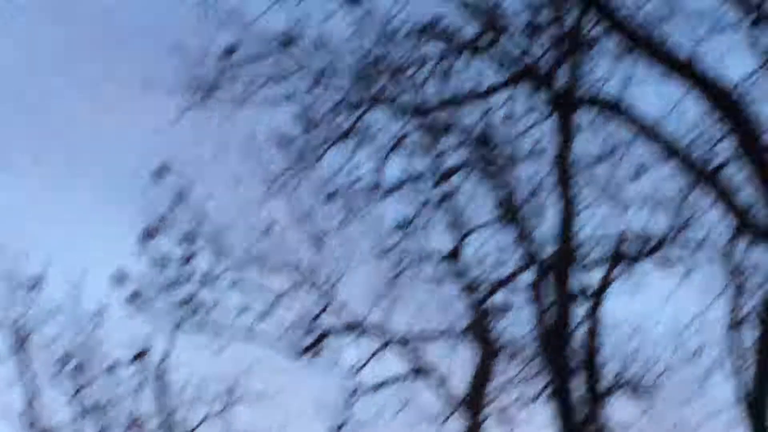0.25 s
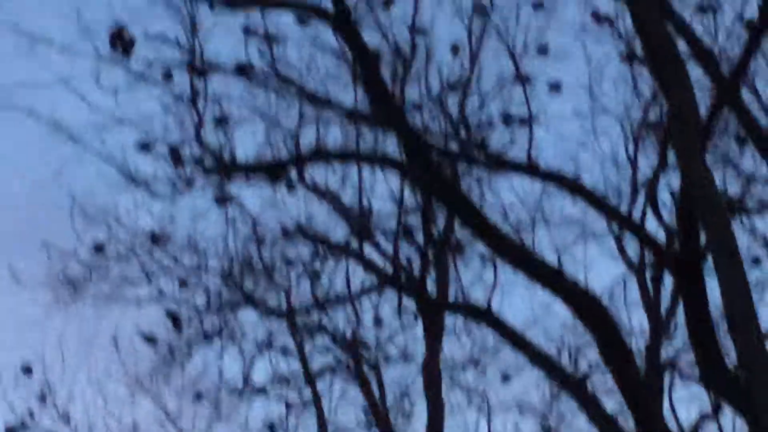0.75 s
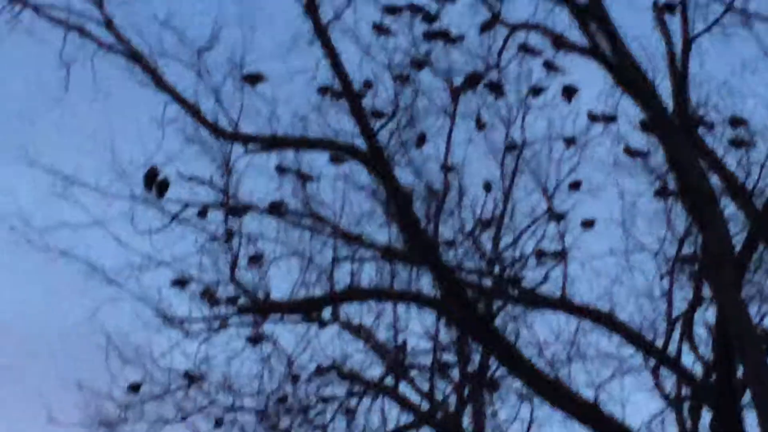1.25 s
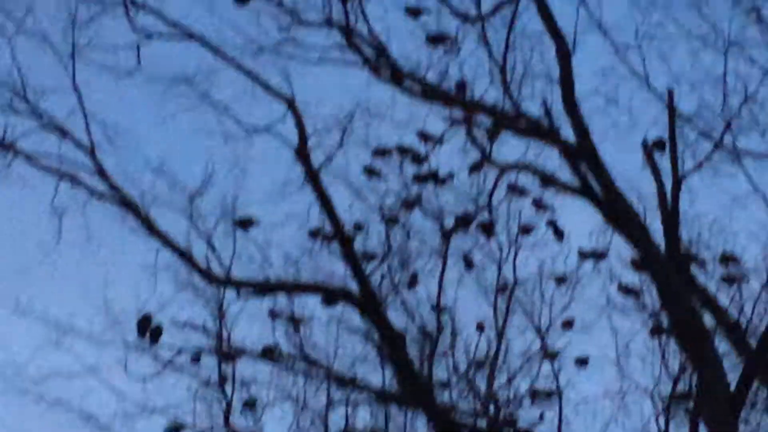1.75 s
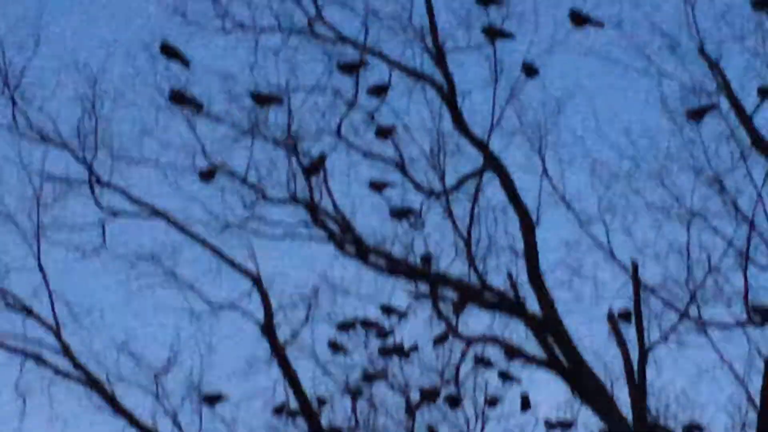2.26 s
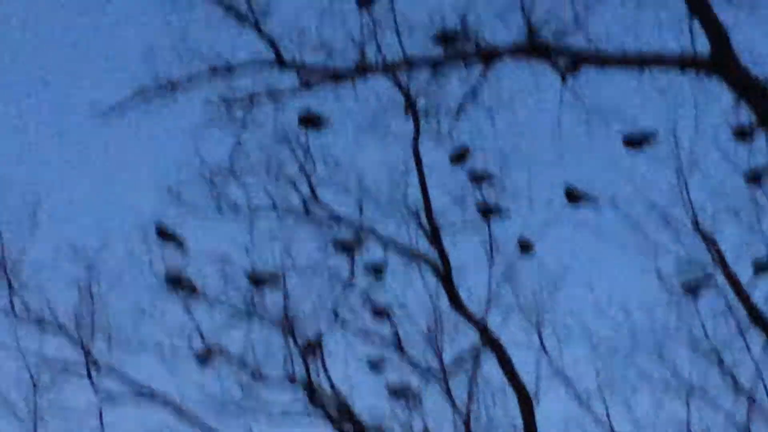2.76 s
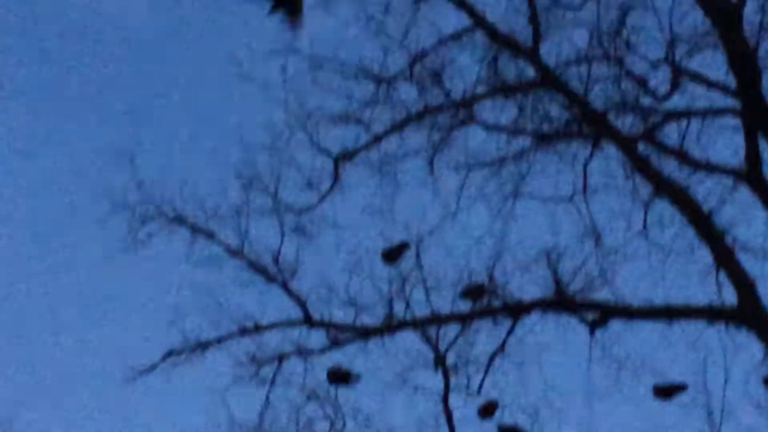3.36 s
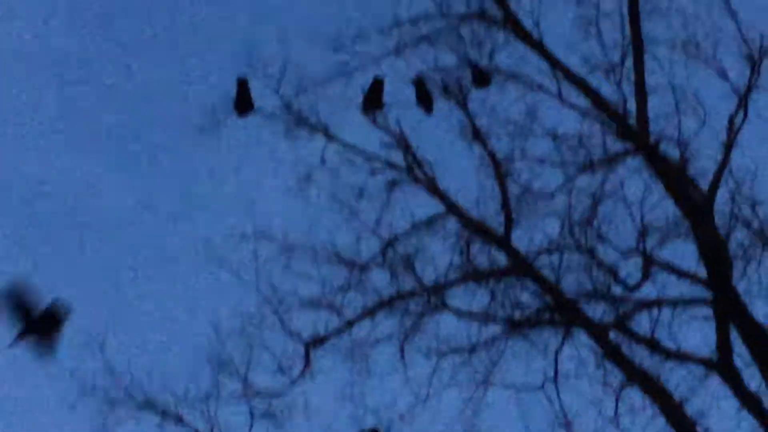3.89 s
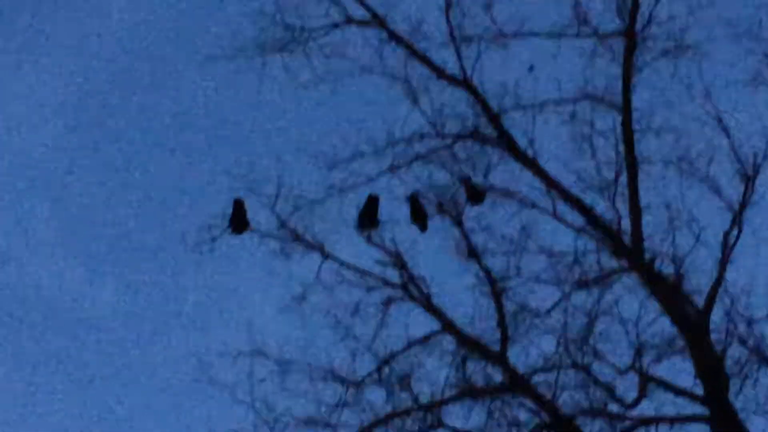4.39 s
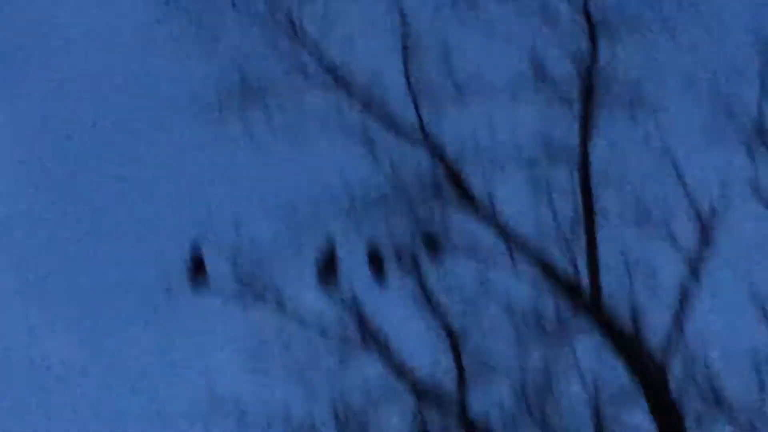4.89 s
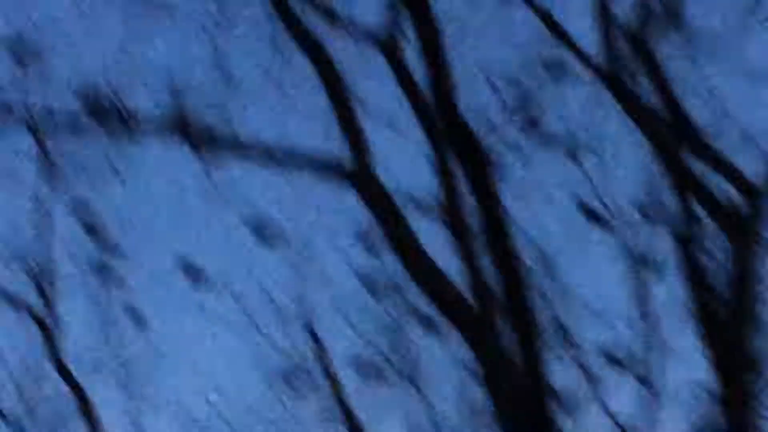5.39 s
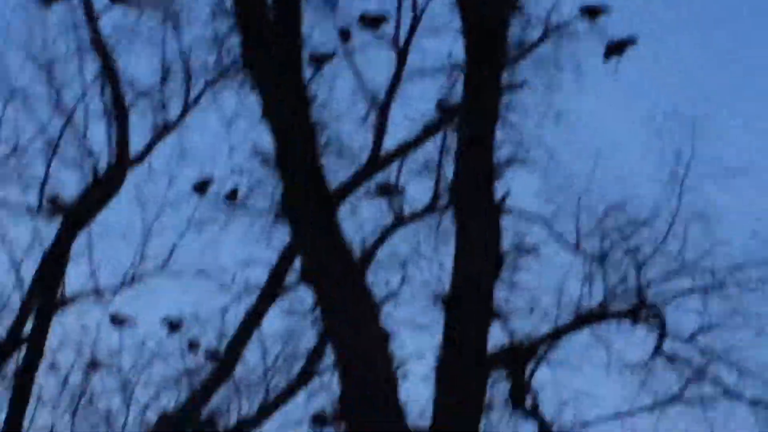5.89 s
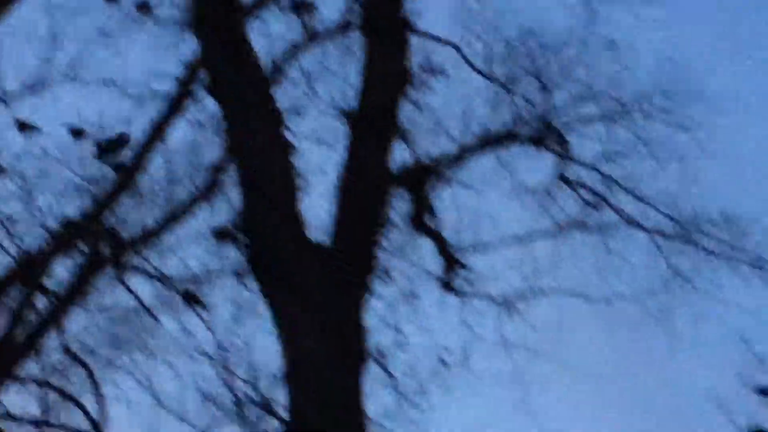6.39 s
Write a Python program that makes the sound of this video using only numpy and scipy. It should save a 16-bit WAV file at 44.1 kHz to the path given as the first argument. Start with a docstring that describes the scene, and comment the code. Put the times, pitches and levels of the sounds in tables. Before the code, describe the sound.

An open wood with a short, diffuse echo, low distant rumble and faint hiss. From the start, hundreds of far crows form a faint blurred chatter. One crow, somewhat distant, gives long hoarse caws at about 0.6, 1.1, 1.65 and 2.2 seconds, each a quarter second or so, arching and falling in pitch. A soft thump lands at 2.5. Small high yips repeat evenly from 2.6 to 3.6. Then nearer crows join with short raspy caws, crowding together between 4 and 6 seconds, with yips and higher yelps breaking upward around 4.8, 5.2 and 5.7. The far flock swells most near 4.6. Dull handling thumps and low rubbing cluster from 4.0 to 5.2, with tiny ticks scattered throughout. A low, rapid flutter strengthens in spells, around 0.2-1.7, 2.5-2.9, 3.6-4.3 and after 5.65. Calling thins to a last weak caw at 6.3, ending around 6.6.

```python
"""A flock of crows at its roost in bare trees at dusk: hoarse caws and short high yelps in an echoing wood.
Each call is a pulse train with a rasp, on an arched pitch, through resonances that shift as the beak opens.
Behind them chatters the far flock, hundreds of calls filtered and echoed, over a bed of rumble and faint hiss.
A hand-held camera adds a low flutter in spells (a beat train ringing its body), handling thumps and ticks."""
import sys
import numpy as np
from scipy import signal
from scipy.fft import rfft, irfft, next_fast_len
from scipy.io import wavfile

SR = 44100
rng = np.random.default_rng(int(sys.argv[2]) if len(sys.argv) > 2 else 0)


def to_wav(s):
    """Save 16-bit WAV."""
    ch = np.atleast_2d(s).T  # columns
    pcm = np.round(np.clip(ch, -1, 1) * 32767)  # PCM
    wavfile.write(sys.argv[1], SR, pcm.astype(np.int16))


N = 292912
TIME = np.arange(N) / SR  # [s]

# Gestures, here and in the sources below, describe the course of one call.
# Shares of its length: top (highest pitch), attack, release, opens (beak half open), opening (time it takes).
# Shares of the top pitch: climb (before the top), leap (a sudden break up to it), drop (after it), jitter.
# In dB: start_db and end_db (against the held level), shake_db (fast tremor),
# flare_db (overtones at the height of the effort against the rest of the call; negative makes them dip).
# The gesture of a long caw:
LONG_GESTURE = dict(top=.35, climb=0.0699, leap=0, drop=.17, attack=0.05, release=0.25, start_db=-17, end_db=-7, opens=.55, opening=0.36, jitter=0.0248, shake_db=3, flare_db=10.5)
# Narrow resonance of the nearly shut beak in high calls: (frequency [Hz], gain [dB])
YELP_SHUT = [(600, -29), (1430, 21), (2200, -17), (5000, -45)]
# Handling thumps: (time [s], peak before the case filter [dB], pitch [Hz])
THUMPS = [(2.527, -36, 79.6), (4.041, -26, 114), (4.115, -29.5, 142), (4.188, -30.5, 84.5),
          (4.297, -24, 129), (4.352, -32, 68.6), (4.399, -21, 115), (4.411, -33.5, 80), (4.529, -28.5, 132),
          (4.692, -29.5, 175), (4.824, -28, 105), (4.866, -32.5, 149), (4.92, -32, 106),
          (4.947, -21.5, 158), (4.961, -26.5, 248), (4.973, -23, 113), (5.023, -25, 88), (5.092, -24, 290),
          (5.145, -38, 258), (5.176, -30.5, 121)]


def amp(db):
    """Level law: decibels to amplitude gain."""
    return 10 ** (np.asarray(db) / 20)


def evened(x):
    """Normalization: scales to rms 1."""
    return x / np.sqrt(np.mean(x ** 2) + 1e-20)


def along(points, at):
    """Linear interpolation of a curve."""
    return np.interp(at, *np.transpose(points))


def ramp(x):
    """Linear ramp: 0 before, a straight rise, 1 after."""
    return np.clip(x, 0, 1)


def read(points, hz):
    """Interpolation of a spectrum on a log-frequency axis."""
    f, value = np.transpose(points)
    return np.interp(np.log(hz + 1), np.log(f), value)


def add(mix, s, sound):
    """Superposition: mixes a sound in at time s, in place."""
    part = mix[max(round(s * SR), 0):][:len(sound)]
    part += sound[:len(part)]


def colour(x, spectrum, treble_db=0):
    """Zero-phase filtering by a spectrum [dB], with a treble shelf that rises from 1700 to 4000 Hz."""
    size = next_fast_len(len(x))
    hz = np.fft.rfftfreq(size, 1 / SR)
    shelf_db = treble_db * read([(1700, 0), (4000, 1)], hz)
    gain = amp(read(spectrum, hz) + shelf_db)
    return irfft(rfft(x, size) * gain, size)[:len(x)]


def wander(t, per_s):
    """Random modulation: straight lines between normal draws, per_s of them a second."""
    return np.interp(t * per_s, np.arange(512), rng.standard_normal(512))


def course(u, g):
    """Vocal gesture over the share u of a call (0-1): pitch arch, level swell [dB] and beak opening."""
    leap_share, drop_bend = 0.093, 1.4  # share of the call the break takes; power by which the fall steepens
    before = ramp(1 - u / g["top"])
    after = ramp((u - g["top"]) / (1 - g["top"]))
    leap = g["leap"] * ramp((g["top"] - u) / leap_share)
    arch = 1 - g["climb"] * before ** 2 - leap - g["drop"] * after ** drop_bend
    attack_db = g["start_db"] * ramp(1 - u / g["attack"])
    release_db = g["end_db"] * ramp(1 - (1 - u) / g["release"])
    beak = ramp(.5 + (u - g["opens"]) / g["opening"])
    return arch, attack_db + release_db, beak


def voice(length, hz, rough, gesture):
    """Source of the source-filter model: syrinx pulses and cycle-locked noise; also the beak opening."""
    rattle_hz = 58.14  # the throat's tremor, nearly regular; each call scales it by a chance factor
    t = np.arange(int(length * SR)) / SR
    arch, swell_db, beak = course(t / length, gesture)
    jitter = gesture["jitter"]
    turns = np.cumsum(hz * arch * (1 + jitter * wander(t, 262.8))) / SR + rng.random()
    # Cycles of unequal length blur the high overtones into a rasp
    turns = turns + 1.4 * jitter * wander(t, hz)
    # Closed-form sum of equally strong harmonics up to about 11 kHz
    order = int(11000 / hz) + .5
    pulses = np.sin(2 * np.pi * order * turns) / (np.sin(np.pi * turns) + 1e-12) - 1
    # Noise that bursts and decays once a cycle
    rasp = (0.27 + np.exp(-(turns % 1) / 0.76)) * rng.standard_normal(SR // 2)[:len(t)]
    rough = np.clip(rough, .02, .8)
    rattle_phase = 2 * np.pi * (rattle_hz * rng.uniform(0.882, 1.107) * t + rng.random())
    rattle = np.sin(rattle_phase + 0.8 * wander(t, 27.6))
    shake_db = gesture["shake_db"] * (rattle + .5 * wander(t, 109.7))
    drive = np.sqrt(1 - rough) * evened(pulses) + np.sqrt(rough) * evened(rasp)
    return drive * amp(swell_db + shake_db), beak


def callers(calls, gesture, shut, throat):
    """Source-filter synthesis, one call a row: the resonances crossfade from shut beak to open throat."""
    # Overtones that the effort raises or lowers: (frequency [Hz], gain [dB])
    overtones = [(1900, -34), (2700, 2), (3800, -9), (4300, -2), (6000, -25)]
    flare_lag, flare_width = 0.049, 0.1  # shares of a call: the effort peaks just after the top pitch
    out = np.zeros(N)
    for s, length, hz, db, rough, treble_db in calls:
        drive, beak = voice(length, hz, rough, gesture)
        u = np.linspace(0, 1, len(drive))
        effort = np.exp(-((u - gesture["top"] - flare_lag) / flare_width) ** 2)
        flare = amp(gesture["flare_db"] * (effort - .5)) - 1
        drive = drive + flare * colour(drive, overtones)
        beak = beak + (1 - beak) * min(2 * rough ** 2, 1)  # the harshest calls come with the beak wider
        hollow = evened(colour(drive, shut))
        bright = evened(colour(drive, throat, treble_db))
        call = (1 - beak) * hollow + beak * bright
        add(out, s, amp(db) * evened(call) * signal.windows.tukey(len(call), .1))
    return out


def long_caws():
    """Formant resonance in long, low caws of a crow farther off."""
    # (time [s], length [s], top pitch [Hz], level before the echo [dB], roughness [0-1], treble [dB])
    long_calls = [(.595, 0.25, 421, -48, 0.42, -3), (1.115, .26, 425.7, -49.5, 0.4, -1),
                  (1.65, .29, 422.4, -51.5, 0.3, -3), (2.225, .29, 421.8, -50, 0.42, -3)]
    # Resonances of the nearly shut beak: (frequency [Hz], gain [dB])
    long_shut = [(500, -38), (1050, -3), (1270, 6.5), (1600, -28), (2050, -19.5), (2600, -57), (2950, -7),
                 (3400, -50), (4200, -18.5), (5200, -31), (9000, -40)]
    # Resonances of the open throat: (frequency [Hz], gain [dB])
    long_throat = [(300, -21), (850, -38), (1200, 5.5), (1560, 5), (1800, -1), (2100, -9.5), (2500, -5.5),
                   (2850, -5.5), (3350, -17), (4200, -17), (5000, -22.5), (6200, -19), (7500, -39),
                   (11000, -32)]
    return callers(long_calls, LONG_GESTURE, long_shut, long_throat)


def short_caws():
    """Formant resonance in short, hoarse caws of nearer crows."""
    # (time [s], length [s], top pitch [Hz], level before the echo [dB], roughness [0-1], treble [dB])
    caw_calls = [(2.02, .15, 526, -62.5, 0, 11), (3.56, 0.18, 427, -44, 0.22, 3.5),
                 (3.7, 0.2, 441, -52, .48, -2), (4.065, 0.15, 430.5, -43.5, .12, 2.5),
                 (4.235, .17, 417, -49, 0.54, 0.5), (4.625, .17, 433.4, -45, 0.38, -7),
                 (4.79, 0.14, 450.6, -47.5, 0.38, 4.5), (4.905, .13, 441.6, -45, 0.1, 3),
                 (5.08, .14, 388, -51, 0.36, 4), (5.185, .16, 431.5, -45.5, 0.32, 4),
                 (5.355, 0.1107, 420.5, -45, 0.42, 0), (5.45, 0.29, 459, -51.5, 0.5, -2),
                 (5.645, 0.11, 463, -48.5, 0.4, 6), (5.795, 0.12, 426.2, -45, 0.22, 3),
                 (5.91, 0.17, 385, -50, 0.42, -10), (6.31, 0.17, 430, -57.5, 0.3, -2)]
    # The gesture of a short caw, terms as above
    caw_gesture = dict(top=0.46, climb=.085, leap=0, drop=.115, attack=0.16, release=0.33, start_db=-9, end_db=-15, opens=0.84, opening=.26, jitter=0.0131, shake_db=5.5, flare_db=-4)
    # Resonances of the nearly shut beak: (frequency [Hz], gain [dB])
    caw_shut = [(500, -60), (1050, -10), (1270, 1), (1600, -17), (2100, -23.5), (2600, -31.5), (5000, -35),
                (10000, -48)]
    # Resonances of the open throat: (frequency [Hz], gain [dB])
    caw_throat = [(300, -38), (850, -17), (1100, 14.5), (1500, 7), (2050, 1), (2600, -51), (2950, -7.5),
                  (3600, -28), (4500, -15), (6300, -11.5), (7500, -29), (11000, -43)]
    return callers(caw_calls, caw_gesture, caw_shut, caw_throat)


def high_yelps():
    """Register break: high calls whose pitch leaps upward to its top."""
    # (time [s], length [s], top pitch [Hz], level before the echo [dB], roughness [0-1], treble [dB])
    yelp_calls = [(4.82, .12, 865, -49.5, 0.2, -5.5), (5.235, 0.14, 847, -48, 0.06, -2.5),
                  (5.69, 0.13, 845, -49.5, 0.23, -5)]
    # The gesture of a yelp, terms as above
    yelp_gesture = dict(top=.5, climb=0.0662, leap=.08, drop=0.093, attack=0.16, release=.28, start_db=-19, end_db=-6, opens=0.12, opening=0.44, jitter=0.0079, shake_db=3.2, flare_db=2)
    # Resonances of the open throat: (frequency [Hz], gain [dB])
    yelp_throat = [(400, -19), (820, 2), (1500, 19), (2000, -22), (2550, 1), (3100, 5), (3500, -1.5),
                   (4250, -5), (5200, -22), (6700, -3.5), (8000, -13), (12000, -43)]
    return callers(yelp_calls, yelp_gesture, YELP_SHUT, yelp_throat)


def short_yips():
    """Register break in short yips, with a smaller leap and a long release."""
    # (time [s], length [s], top pitch [Hz], level before the echo [dB], roughness [0-1], treble [dB])
    yip_calls = [(2.62, 0.1, 762, -56.5, 0.3, 2), (2.85, 0.083, 750, -53.5, 0, -1),
                 (3.08, .1, 740, -54.5, .08, -5), (3.31, 0.086, 758, -54.5, 0.2, -2),
                 (3.565, 0.08, 757, -58, .08, -2), (4.21, .13, 765, -54, 0.42, 0),
                 (4.49, .14, 764, -52, 0.4, -3), (4.77, 0.12, 783, -63, 0.42, 10),
                 (4.885, .1, 785, -47.5, .3, -2), (5.085, 0.096, 746, -61.5, 0.64, 3),
                 (5.315, 0.12, 737, -49, .3, 1.5), (5.635, 0.093, 750, -53, 0.54, -1.5)]
    # The gesture of a yip, terms as above
    yip_gesture = dict(top=.52, climb=.1, leap=.05, drop=0.112, attack=0.21, release=0.84, start_db=-3, end_db=-10, opens=0.49, opening=0.21, jitter=0.0064, shake_db=3, flare_db=1)
    # Resonances of the open throat: (frequency [Hz], gain [dB])
    yip_throat = [(400, -9), (800, 0), (1450, 8), (2200, -21), (3050, -23), (3700, 2.5), (4500, -5.5),
                  (5200, -13), (6700, -29), (12000, -48)]
    return callers(yip_calls, yip_gesture, YELP_SHUT, yip_throat)


def wood(x, wet_db):
    """Reverberation: direct sound plus sparse echoes from trunks and twigs, decaying by band."""
    # Decay time of the echo: (frequency [Hz], time to fall 60 dB [s])
    wood_t60 = [(200, 0.097), (1300, 0.84), (4000, 1), (9000, 0.63)]
    # Twigs shade the direct treble: (frequency [Hz], gain [dB])
    shade = [(3500, 0), (6000, -8)]
    # Twigs scatter treble all round into the echo: (frequency [Hz], gain [dB])
    scatter = [(1500, 0), (3000, 2), (5000, 8)]
    taps = rng.standard_normal(SR) * (rng.random(SR) < 2500 / SR)  # about 2500 echoes in one second
    hz, t, z = signal.stft(taps, SR, nperseg=256)
    decay = amp(-60 * t / read(wood_t60, hz)[:, None])
    build_up = 1 - np.exp(-t / 0.0047)
    tail = signal.istft(z * decay * build_up, SR, nperseg=256)[1]
    tail = colour(tail / np.linalg.norm(tail), scatter)
    echo = signal.fftconvolve(x, tail)[:N]
    return (colour(x, shade) + amp(wet_db) * echo) / np.hypot(1, amp(wet_db))


def flock(count=300):
    """Superposition of hundreds of far caws at random pitches and levels, spread by the wood's echo."""
    # Spectral filter of the far flock: (frequency [Hz], gain [dB])
    flock_tone = [(300, -39), (600, -20), (900, -5.5), (1100, -2.5), (1350, 4), (1700, -3), (2200, -10),
                  (2700, -23.5), (4500, -46), (8000, -75)]
    # Level of the far flock: (time [s], level [dB])
    flock_level = [(0, -60), (1, -58.5), (2, -54), (3.1, -57), (4, -51.5), (4.6, -46.5), (5.5, -51.5),
                   (6.1, -56.5), (6.64, -58.5)]
    gesture = dict(LONG_GESTURE, jitter=.013, shake_db=1.5, flare_db=0)
    lead = SR // 2  # the chatter is already under way at the start
    out = np.zeros(N + lead)
    for k, (when, long, high, near) in enumerate(rng.random((count, 4))):
        call, _ = voice(.1 + .16 * long, 340 * 1.7 ** high, 0.33, gesture)
        s = (k + when) / count * len(out) / SR
        add(out, s, amp(10 * near) * call)
    chatter = wood(colour(out[lead:], flock_tone), wet_db=-6)
    return amp(along(flock_level, TIME)) * evened(chatter)


def flutter():
    """Minimum-phase resonance: an even train of soft beats rings the camera body, stronger in spells."""
    # Strong spells; the fall begins at the end time: (start [s], end [s], level [dB])
    flutter_spells = [(.18, 1.72, -44.5), (2.47, 2.94, -44.5), (3.61, 4.3, -44), (5.651, 6.4, -43.5)]
    # The camera body's answer to each beat: (frequency [Hz], gain [dB])
    body = [(22, -25), (34, -10), (45, 0), (68, 0), (90, -8), (115, -5), (160, -12), (210, -13), (280, -26),
            (600, -48), (2000, -80)]
    idle_db, rise_s, fall_s = -54, 0.025, 0.36
    beat_hz, beat_start_s = 22.497, .2085
    beats = np.diff(np.floor((TIME - beat_start_s) * beat_hz), append=0).clip(0, 1)
    log_gain = np.log(amp(read(body, abs(np.fft.fftfreq(16384, 1 / SR)))))
    # Phase taken from the log gain, so that the body rings only after the beat
    ring = np.fft.ifft(np.exp(signal.hilbert(log_gain).conj())).real[:SR // 5]
    throb = signal.fftconvolve(beats * amp(wander(TIME, 25)), ring)[:N]
    lift_db = 0
    for start, end, db in flutter_spells:
        spell = ramp((TIME - start) / rise_s) * ramp(1 - (TIME - end) / fall_s)
        lift_db = lift_db + (db - idle_db) * spell
    return amp(idle_db + lift_db) * evened(throb)


def buffeting():
    """Power addition: low rubbing noise that swells round every thump over a steady bed."""
    # Spectral filter of the rubbing: (frequency [Hz], gain [dB])
    buffet_tone = [(30, -13), (70, 0.5), (160, -1.5), (300, -16), (520, -25), (800, -47), (2000, -63)]
    bed_db, swell_db = -53.5, -17  # before the case filter; the swell is against the thump's peak
    build_s, die_s = 0.053, 0.021
    power = amp(bed_db) ** 2
    for s, db, _ in THUMPS:
        swell = np.exp(-np.maximum((s - TIME) / build_s, (TIME - s) / die_s))
        power = power + (amp(db + swell_db) * swell) ** 2
    return np.sqrt(power) * evened(colour(rng.standard_normal(N), buffet_tone))


def handling(ring_cycles=0.36, rise_cycles=0.71, snap_db=-8, snap_s=0.00087):
    """Damped oscillation: fingers and moving air push on the case, with buffeting and tiny noise ticks."""
    # Small ticks and scuffs: (time [s], rms level before the decay [dB], decay [s])
    ticks = [(0.271, -64.5, .03), (.987, -58, .002), (1.864, -60.5, 0.0043), (3.485, -57.5, .0025),
             (4.093, -55, .003), (4.663, -59, .0025), (5.39, -47, 0.0013), (6.521, -50.5, 0.0023)]
    # Spectral filter of the ticks: (frequency [Hz], gain [dB])
    tick_tone = [(1000, 1), (3000, -7), (5000, 9), (9000, -3), (15000, -4)]
    out = buffeting()
    t = np.arange(-SR // 20, SR // 20) / SR
    snap = amp(snap_db) * np.exp(-(t / snap_s) ** 2)  # the brief release at the height of each push
    for s, db, hz in THUMPS:
        cycles = t * hz
        push = np.exp(np.where(t < 0, cycles / rise_cycles, -cycles / ring_cycles))
        thump = (push * np.cos(2 * np.pi * cycles) + snap) / (1 + amp(snap_db))
        add(out, s + t[0], -amp(db) * thump)
    # Case filter: (frequency [Hz], gain [dB])
    out = colour(out, [(25, -18), (50, 4), (100, 5.0), (550, 5.0), (1100, 4)])
    age = t[t >= 0]
    for s, db, decay_s in ticks:
        noise = evened(colour(rng.standard_normal(len(age)), tick_tone))
        add(out, s, amp(db) * noise * np.exp(-age / decay_s))
    return out


def air(db=-47):
    """Filtered noise: distant rumble, the blur of the farthest birds and a faint hiss."""
    # Spectral filter of the evening air: (frequency [Hz], gain [dB])
    air_tone = [(20, -38), (45, 6), (100, -3), (210, 2.5), (290, -13), (500, -15), (900, -11),
                (1400, -15.5), (2100, -18), (2800, -32), (5000, -37.5), (8000, -45.5), (15000, -49)]
    return amp(db) * evened(colour(rng.standard_normal(N), air_tone))


def scene():
    """Superposition: birds in the echoing wood, the far flock, the air and the camera's own noises."""
    caws = long_caws() + short_caws()
    high_calls = high_yelps() + short_yips()
    birds = wood(caws, wet_db=-8.5) + wood(high_calls, wet_db=-12)
    return (birds + flock() + air() + flutter() + handling())[None]


def record(dry):
    """Band limitation: the recorder's linear-phase low-pass."""
    edge_hz = 15400
    low_pass = signal.firwin(511, edge_hz, window=("kaiser", 9), fs=SR)
    return signal.oaconvolve(dry, low_pass[None], "same")


dry = scene()
out = record(dry)
to_wav(out)
```